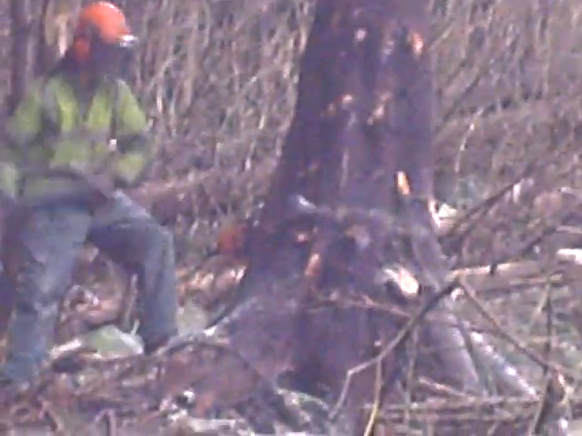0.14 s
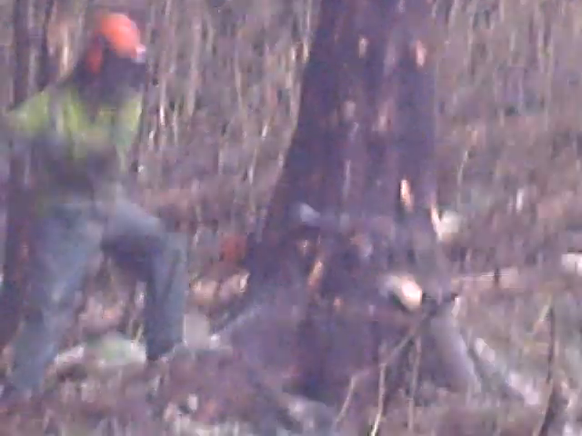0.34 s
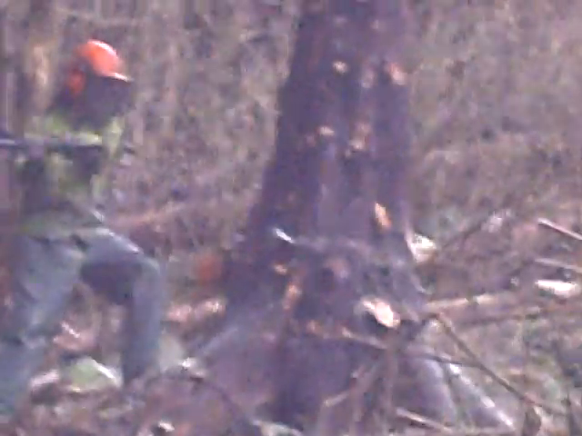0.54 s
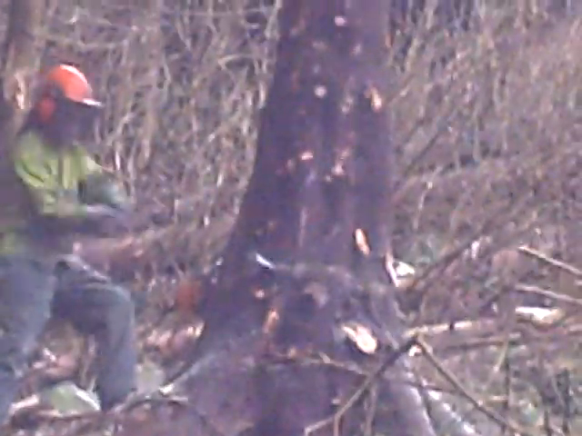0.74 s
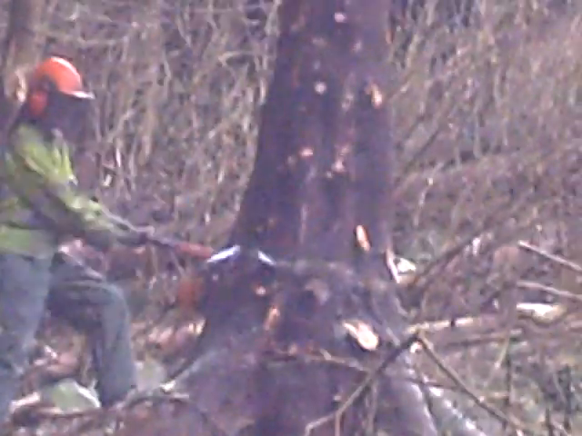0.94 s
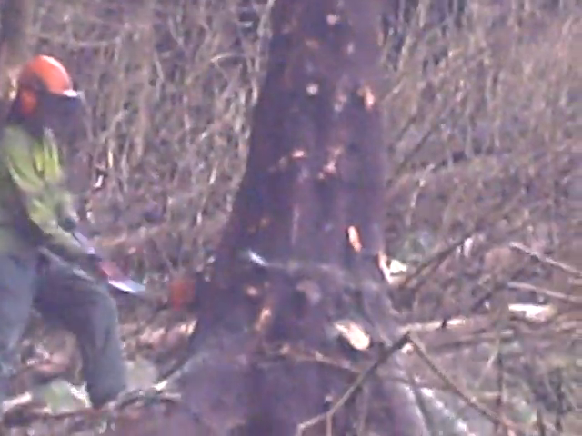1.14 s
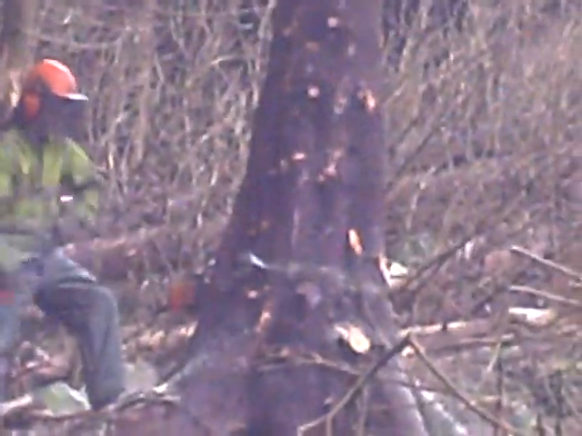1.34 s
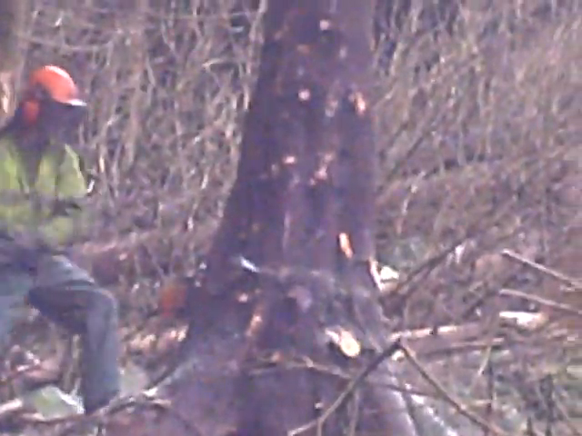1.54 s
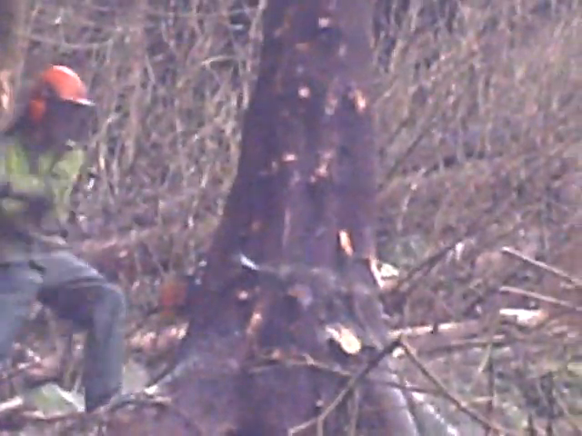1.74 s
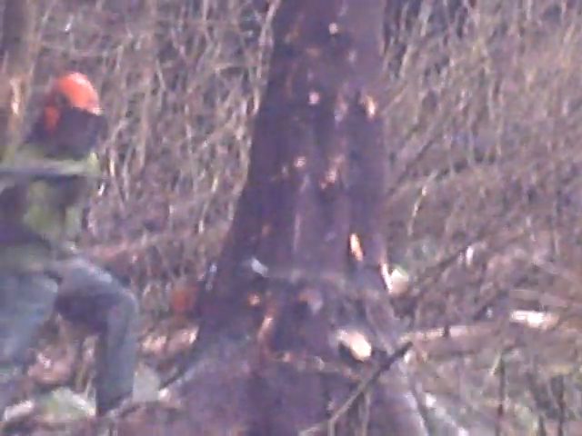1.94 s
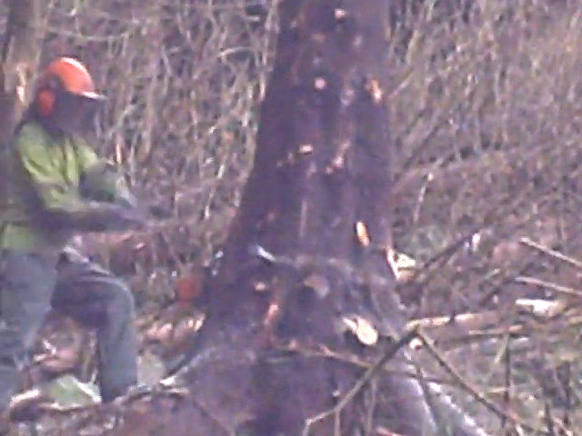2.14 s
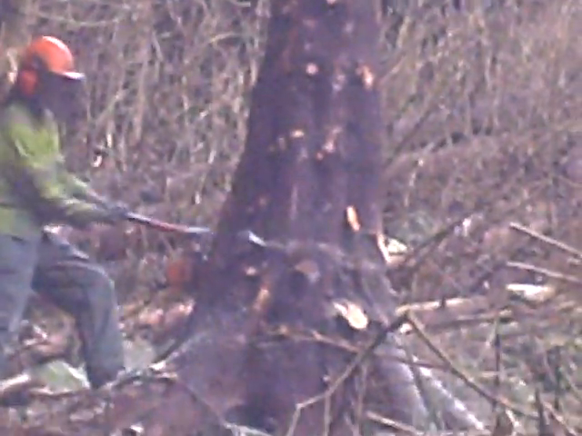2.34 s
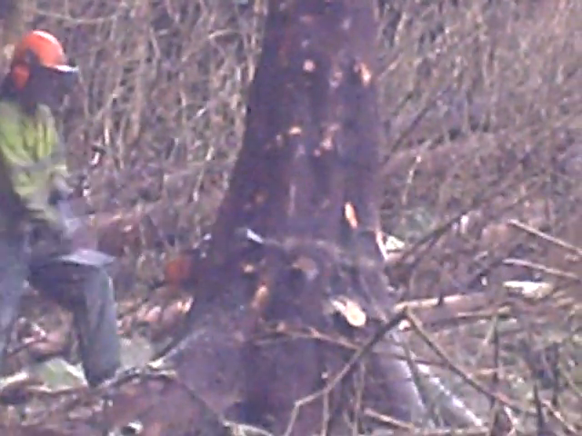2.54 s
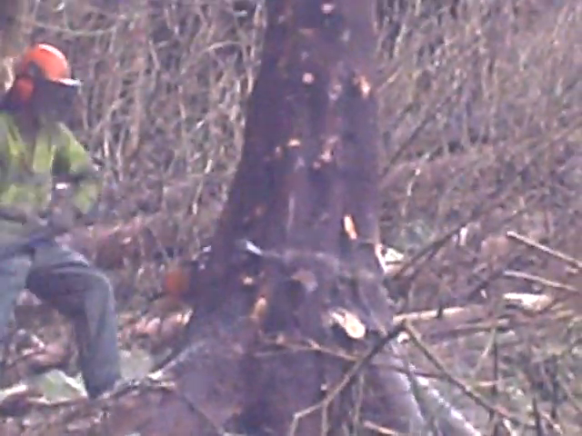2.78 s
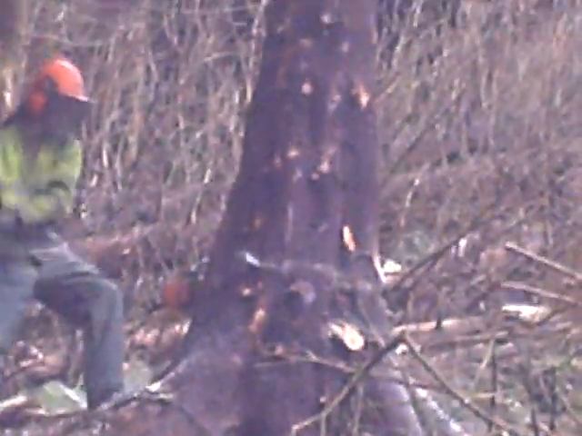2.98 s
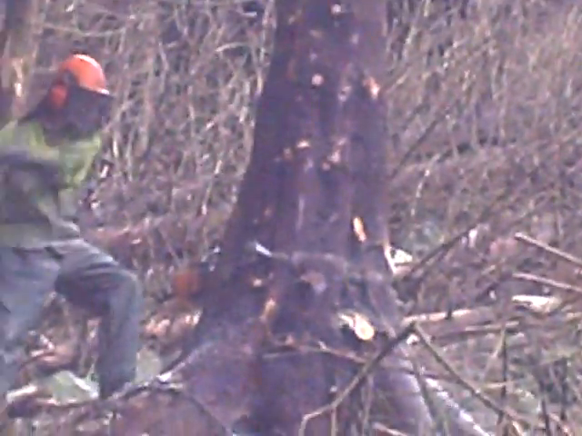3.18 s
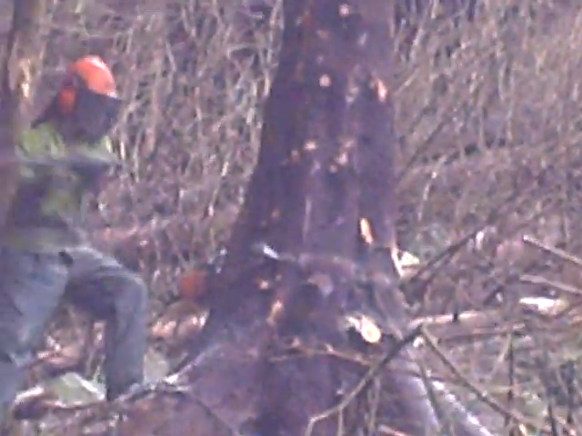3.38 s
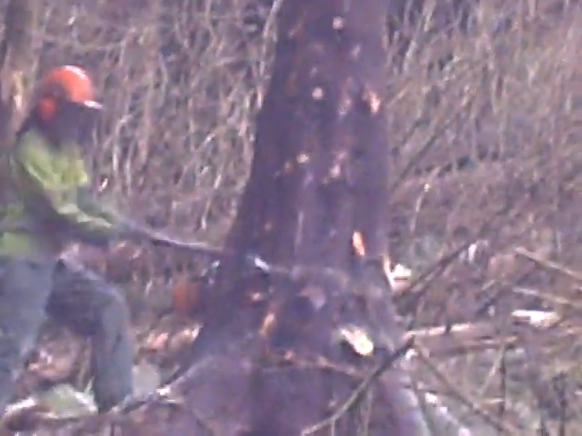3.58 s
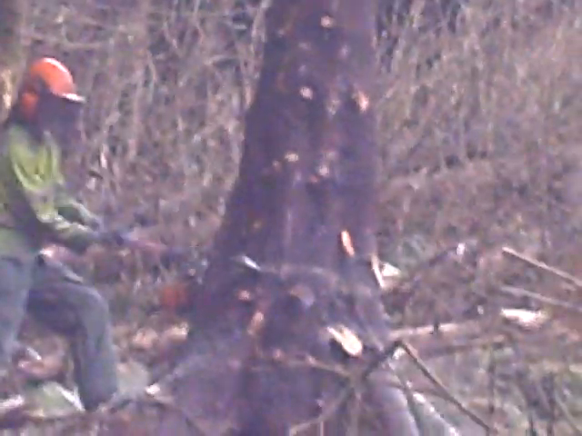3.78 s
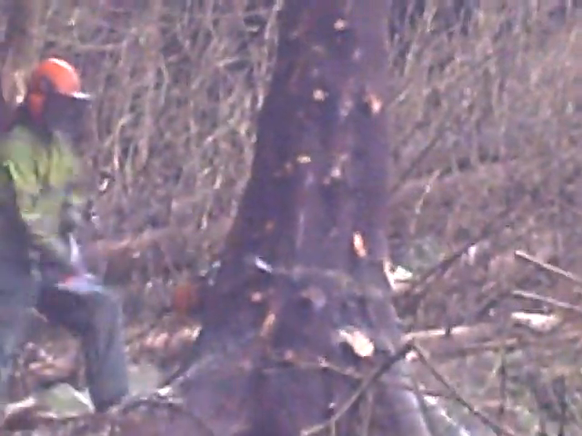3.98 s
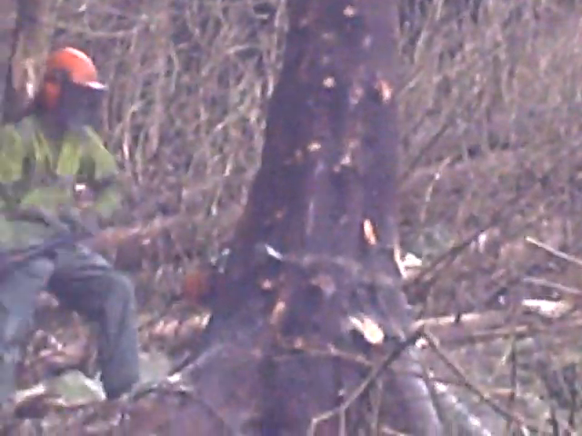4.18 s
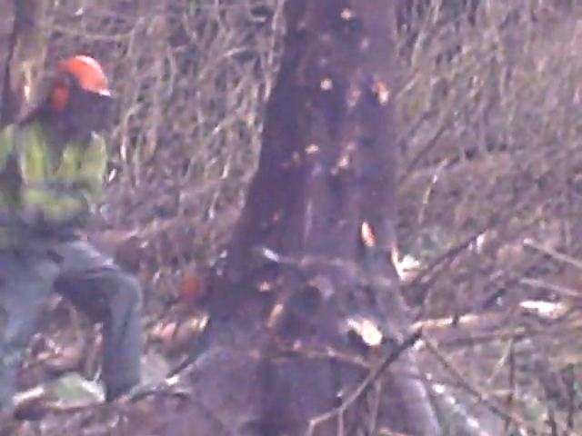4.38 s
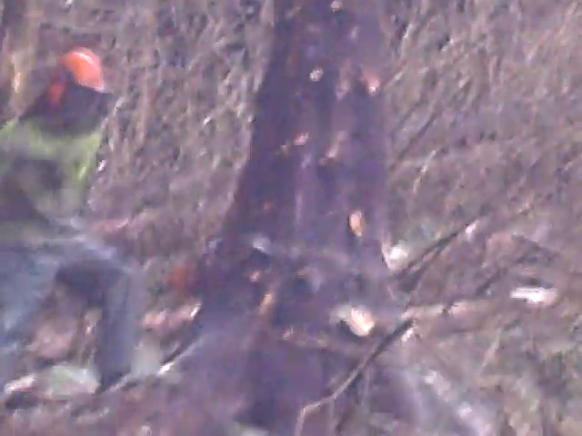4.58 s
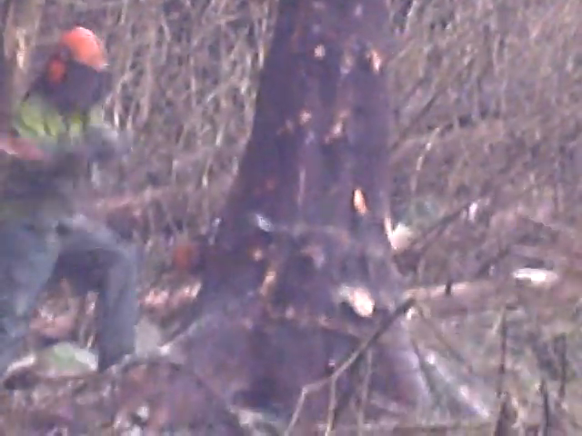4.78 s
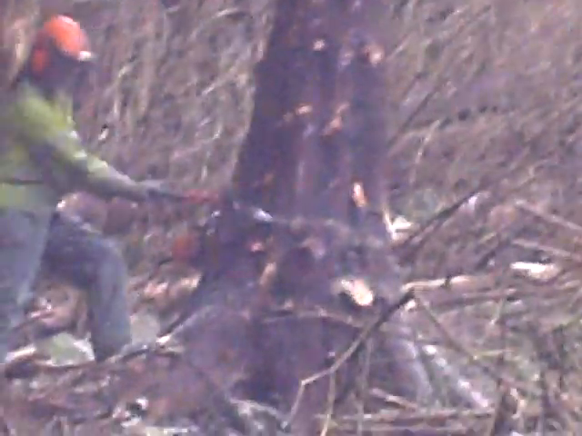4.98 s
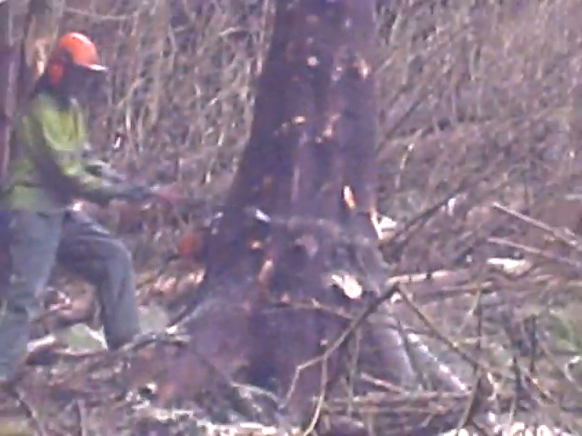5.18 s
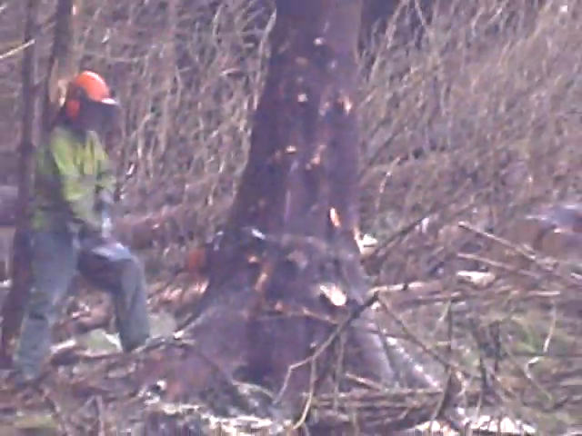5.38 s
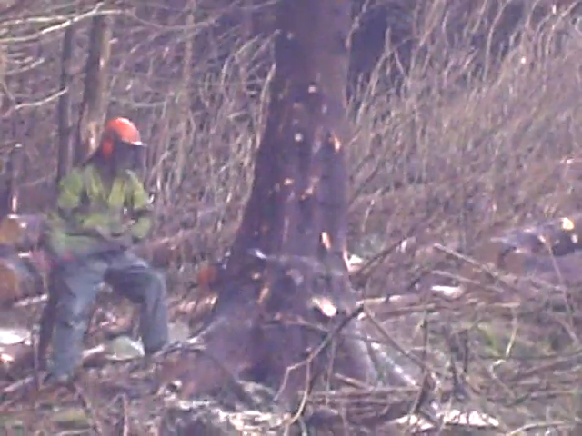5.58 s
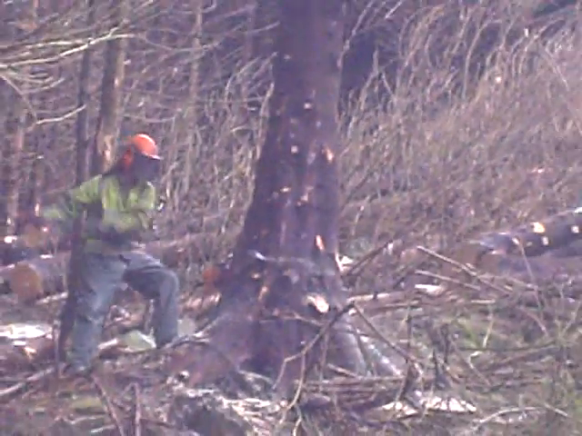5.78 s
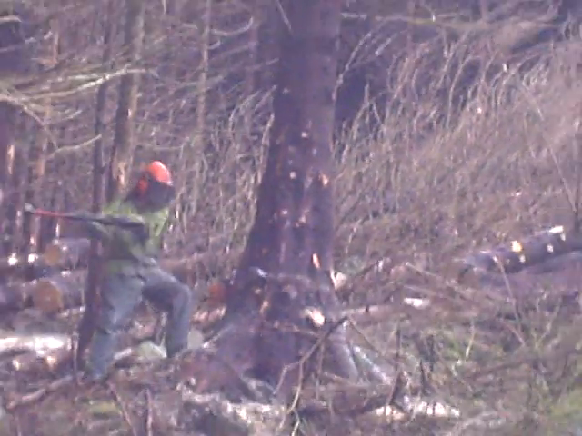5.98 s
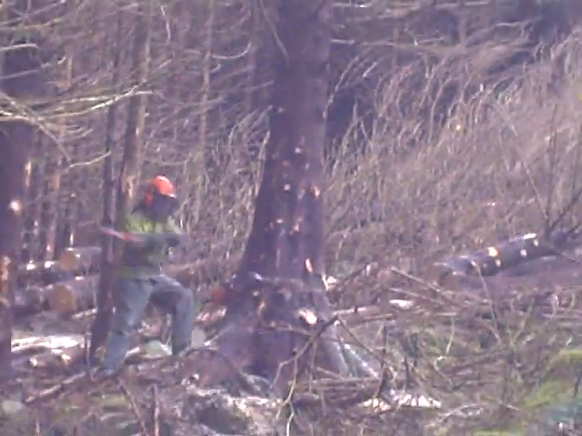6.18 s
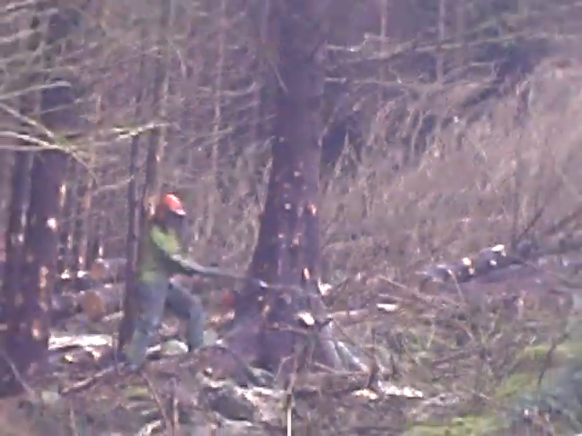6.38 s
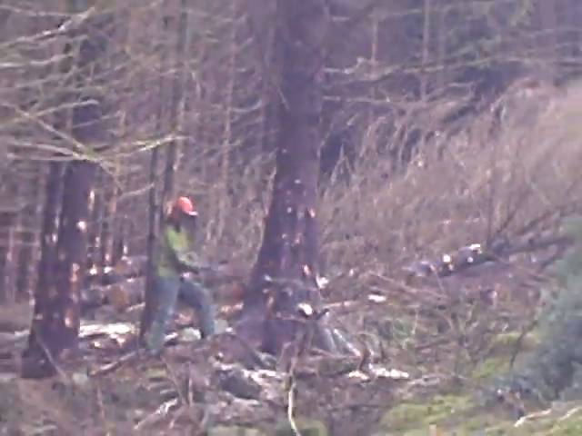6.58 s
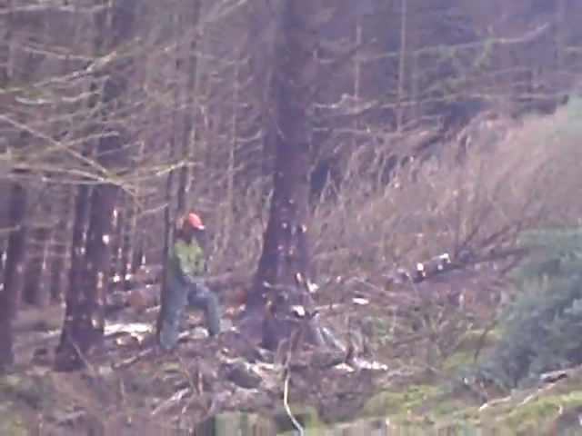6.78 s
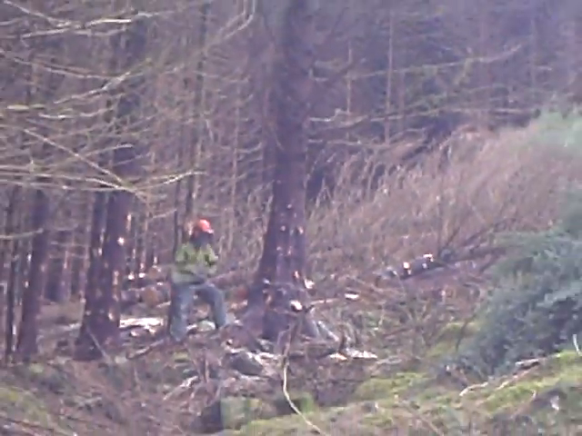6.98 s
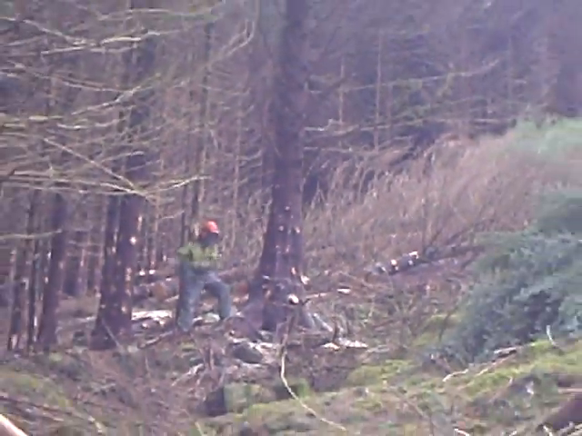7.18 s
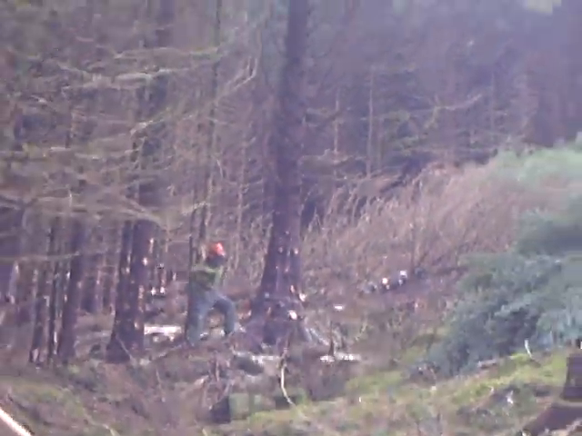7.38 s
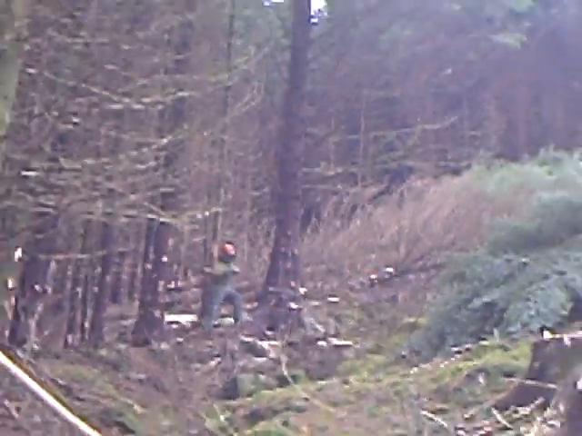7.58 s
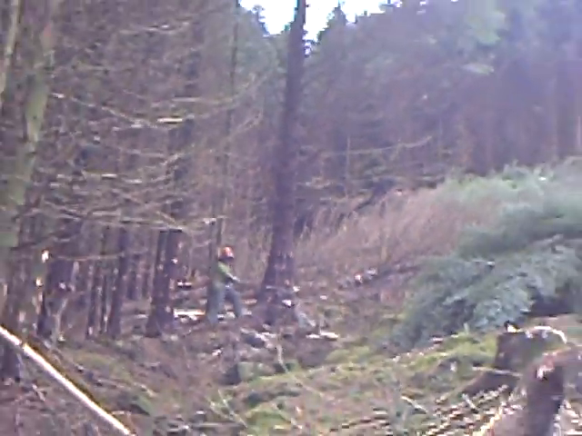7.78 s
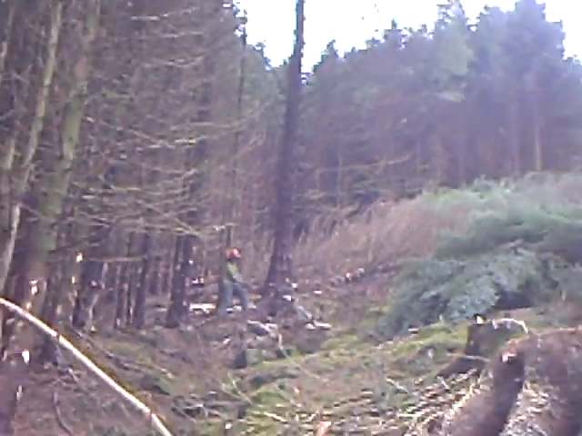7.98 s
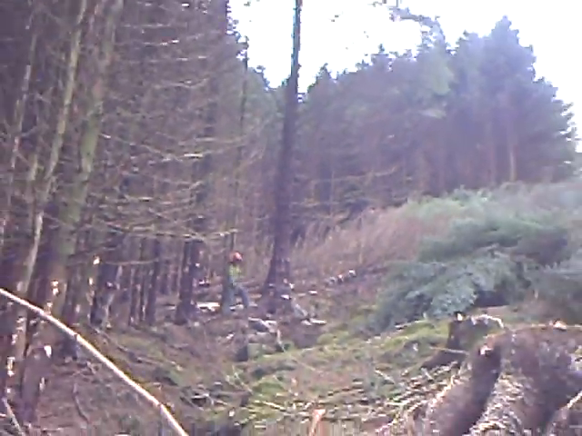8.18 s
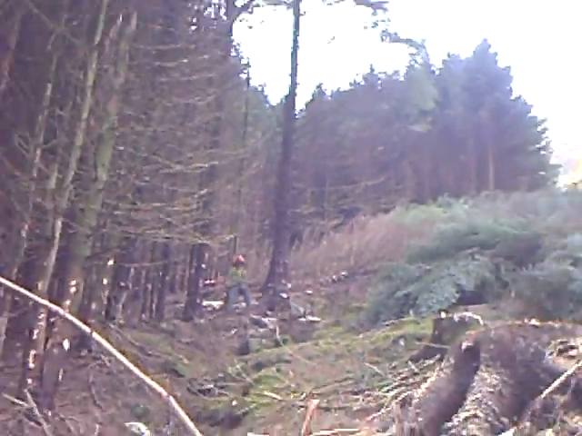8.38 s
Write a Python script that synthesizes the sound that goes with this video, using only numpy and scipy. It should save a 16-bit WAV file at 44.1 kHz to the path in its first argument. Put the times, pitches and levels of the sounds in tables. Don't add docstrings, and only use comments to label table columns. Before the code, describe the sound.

A quiet wooded hillside heard through a small camera microphone: low motor hum with a thin, rattling whirr, soft wind and hissing needles, and a fine patter of dry ticks. A faint distant engine note swells around 1 second, sags slightly and is gone by about 3. At 1.1 seconds a sledge hits a steel wedge, a glancing metallic clank with a crack and thud, its bright ring thrown back by the trunks as a short blurred echo. Further blows follow at 2.4, 3.8, 5.2, 6.5 and 7.9 seconds, the fifth hardest; the direct clank gets gradually duller, and the strikes overload the input. Between them come clear twig snaps, notably near 1.6 and 6.6, soft dull hand rubs near 0.5, 3.1 to 3.6, 5.4 and 8.1, and one camera button click at 5.0, just before the fourth blow. The last echo fades into hum at 8.4.

```python
import sys
import numpy as np
from scipy import signal
from scipy.fft import rfft, irfft, next_fast_len
from scipy.io import wavfile
from scipy.ndimage import uniform_filter1d, map_coordinates

SR = 44100
rng = np.random.default_rng(int(sys.argv[2]) if len(sys.argv) > 2 else 0)


def ratio_of_db(decibels):
    return 10 ** (np.asarray(decibels, float) / 20)


def materialize(psi):
    bounded = np.clip(np.atleast_2d(psi).T, -1, 1)
    quanta = np.round(bounded * 32767).astype(np.int16)
    wavfile.write(sys.argv[1], SR, quanta)


N = 371763

# (frequency [Hz], level [dB], t60 [s])
STEEL_MODES = [(700, -8, 0.018), (896, -6, 0.025), (1330, -10, 0.049), (1641, -4, 0.042), (2102, -7.5, 0.057),
               (2622, -4.5, 0.04), (2893, 4, 0.044), (3025, -1, 0.023), (3187, -7, 0.05), (3664, -1, 0.02),
               (3905, 2, 0.028), (4337, 7, 0.023),
               (4900, -9, 0.0083), (4700, -4.5, 0.015), (4911, 3.5, 0.024), (5153, -13.5, 0.022),
        (5315, 3.5, 0.022), (5330, 4.5, 0.012), (5900, -8.5, 0.022), (5845, 3.5, 0.026), (6090, -13, 0.017),
        (7090, -11.5, 0.019), (7500, -9.5, 0.012)]
STEEL = STEEL_MODES


def hammer():
    # (time [s], strength [dB], squareness of the hit [dB])
    blows = [
        (1.0598, -2, -8),
        (2.4209, -1.5, -1.5),
        (3.7967, -2, -1),
        (5.157, -0.5, 0),
        (6.5475, 1.5, 3),
        (7.9435, 0.5, -0.5),
    ]
    # (frequency to camera [Hz], level to camera [dB], frequency to woods [Hz], level to woods [dB])
    leading_modes = [(4230, 11, 5800, 25), (5250, 12, 5400, 25), (4650, 8, 5270, 24), (4720, 16, 4800, 21),
                     (5210, 12, 5200, 31), (5220, 10, 5250, 28)]
    toward_camera = [-9, -9.5, -2.5, 2.5, 1.5]
    toward_woods = [21.5, 16.9, 17, 22, 21]
    top_loss_db_per_s, low_gain_db_per_s = 2.2, 0.5
    echo_per_square = 0.7
    out = np.zeros(N + SR)
    for (s, db, square_db), lead in zip(blows, leading_modes):
        driven_s = s - blows[0][0]
        camera_change_db = [0, 0, 0, square_db, -top_loss_db_per_s * driven_s]
        woods_change_db = [0, low_gain_db_per_s * driven_s, 0, echo_per_square * square_db, 0]
        direct = ratio_of_db(db) * clank(np.add(toward_camera, camera_change_db), lead[:2])
        answer = echo(np.add(toward_woods, woods_change_db), lead[2:], blur_hz=130)
        start = round(s * SR)
        out[start:][:len(direct)] += direct
        out[start:][:len(answer)] += answer
    return out[:N]


def clank(shares_db, lead):
    # (frequency [Hz], width [Hz], level [dB])
    splinter_modes = [(1568, 300, -0.5), (3000, 540, 1), (4630, 2400, -3.5)]
    damping = 0.91
    t = np.arange(SR // 10) / SR
    hz = gripped(lead[0])
    t60 = damping * np.transpose(STEEL)[2][:, None]
    wander = 0.026 * np.cumsum(rng.standard_normal((len(hz), len(t))), axis=1)
    phase = 2 * np.pi * (hz * t + rng.random(hz.shape)) + wander
    level_db = mode_levels(shares_db, lead)[:, None] - 60 * t / t60
    ring = np.sum(ratio_of_db(level_db) * np.sin(phase), axis=0)

    response = resonances(splinter_modes)(np.fft.rfftfreq(len(t), 1 / SR))
    splinter = irfft(rfft(rng.standard_normal(len(t))) * response, len(t))
    crack = ratio_of_db(8.5 - 60 * t / 0.032) * splinter

    trunk = signal.lfilter([0.05, -0.05], [1, -1.94, 0.9408], rng.standard_normal(len(t)))
    thud = ratio_of_db(shares_db[0] + 13.5 - 60 * t / 0.05) * trunk
    contact = 1 - np.exp(-t / 0.00025)
    return (ring + crack + thud) * contact


def echo(shares_db, lead, blur_hz):
    trunks = np.pad(woods(scatter_db=4.5, first_s=0.0098), (0, SR // 10))
    f = np.fft.rfftfreq(len(trunks), 1 / SR)
    hz = gripped(lead[0])
    level_db = mode_levels(shares_db, lead)[:, None]
    power = np.sum(ratio_of_db(2 * level_db) / (1 + (2 * (f - hz) / blur_hz) ** 2), axis=0)
    return irfft(rfft(trunks) * np.sqrt(power), len(trunks))


def woods(scatter_db, first_s):
    # (frequency [Hz], t60 [s])
    trunk_decay = [(300, 0.3), (1000, 0.46), (3000, 0.5), (5000, 0.45), (8000, .3)]
    trunks = rng.standard_normal(SR // 2) * ratio_of_db(scatter_db * rng.standard_normal(SR // 2))
    hz, t, z = signal.stft(trunks, SR, nperseg=256)
    decay = ratio_of_db(-60 * t / along(trunk_decay, hz)[:, None])
    tail = signal.istft(z * decay, SR, nperseg=256)[1]
    tail *= np.clip(np.arange(len(tail)) / SR / first_s, 0, 1)
    return tail / np.linalg.norm(tail)


def mode_levels(shares_db, lead):
    ring_edges = [2250, 3450, 4750, 5450]
    hz, level_db = gripped(lead[0])[:, 0], np.transpose(STEEL)[1]
    share_db = shares_db[np.searchsorted(ring_edges, hz)]
    return np.where(hz == lead[0], lead[1], level_db + share_db + rng.normal(0, 1.1, hz.shape))


def gripped(lead_hz):
    hz = np.transpose(STEEL)[0]
    distance = np.abs(hz - lead_hz)
    return np.where(distance == distance.min(), lead_hz, hz)[:, None]


def button():
    # (time [s], peak [dB])
    presses = [(5.042, -8)]
    # (frequency [Hz], width [Hz], level [dB])
    shell = [(350, 510, -1.5), (1270, 320, 7.5), (3480, 470, -2), (5220, 1700, -2.5), (7300, 900, -8)]
    taps = np.zeros(N)
    for s, db in presses:
        taps[round(s * SR)] = ratio_of_db(db + 6)
        taps[round((s + 0.0004) * SR)] = -ratio_of_db(db - 2)
        taps[round((s + 0.0011) * SR)] = ratio_of_db(db + 20)
        taps[round((s + 0.0019) * SR)] = ratio_of_db(db + 2)
    return filtered(taps, resonances(shell))


def motor():
    # (time [s], level [dB])
    shaft_load = [(0, -38.5), (1.3, -38), (1.7, -35.5), (2.6, -38.5), (4, -38), (6, -39.5), (7.5, -39),
                  (8.43, -37.5)]
    # (frequency [Hz], width [Hz], level [dB])
    housing = [(1180, 28, -4.5), (2056, 60, -11), (2414, 120, -12), (4146, 150, -1), (4306, 170, -3),
               (4590, 190, -2), (4990, 460, -9.5), (6440, 1400, -20.5)]
    shaft_hz, mean_whirr_db, whirr_per_load = 69.85, -38.5, 0.64
    hum_db, = curves(shaft_load)
    whirr_db = mean_whirr_db + whirr_per_load * (hum_db - hum_db.mean())
    turn = 2 * np.pi * np.cumsum(shaft_hz + 0.27 * wobble(4.21)) / SR
    first = ratio_of_db(0.63 * wobble(4)) * np.sin(turn)
    second = ratio_of_db(-8 + 1.6 * wobble(11)) * np.sin(2 * turn + 0.42 * wobble(8.4))
    bursts_db = 2.8 * wobble(70) + 0.46 * wobble(7.6) + 0.39 * np.cos(turn)
    rattle = rng.standard_normal(N) * ratio_of_db(bursts_db)
    whirr = unit(filtered(rattle, resonances(housing)))
    return ratio_of_db(hum_db + 5.5) * (first + second) + ratio_of_db(whirr_db - 0.5) * whirr


def rustles():
    # (time [s], length [s], level [dB], frequency [Hz])
    rubs = [(0.517, 0.063, -37.5, 178), (3.104, 0.021, -37.5, 350), (3.193, 0.084, -41, 330),
            (3.616, 0.063, -41.5, 296), (5.437, 0.041, -41, 700), (8.141, 0.052, -39, 454)]
    t = np.arange(N) / SR
    out = np.zeros(N)
    for s, length, db, hz in rubs:
        rub = unit(filtered(rng.standard_normal(N), resonances([(hz, 0.3 * hz, 0)])))
        out += ratio_of_db(db + 2.5 * wobble(40)) * np.exp(-((t - s) / length) ** 2) * rub
    return out


def ticks():
    # (time [s], peak [dB])
    clear_ticks = [(0.825, -30), (1.1663, -17), (1.2739, -24), (1.5754, -12), (1.676, -28), (2.544, -25),
                   (3.0673, -20), (3.3387, -21), (3.477, -26), (4.154, -28), (4.9675, -20), (5.2389, -16),
                   (5.7647, -25), (6.5963, -13), (7.0314, -24), (8.0076, -20)]
    chance, sizes = rng.random(N), rng.exponential(size=N)
    snaps = (chance < 220 / SR) * ratio_of_db(-36.5 + 3.1 * sizes)
    for s, db in clear_ticks:
        snaps[round(s * SR)] = ratio_of_db(db + 13)
    return filtered(snaps, resonances([(3500, 2500, -8.5), (7040, 3000, -4)]))


def wind():
    # (time [s], level [dB])
    strength = [(0, -41.5), (.7, -41.5), (1.3, -41.5), (1.95, -44.5), (2.7, -43), (3.2, -44), (3.75, -43),
                (4.1, -45), (5.1, -45), (6.4, -44.5), (7.8, -45.5), (8.15, -43), (8.43, -46)]
    # (frequency [Hz], level per Hz [dB])
    gust_spectrum = [(20, -7), (45, 1.5), (95, -1.5), (125, 4), (200, -5), (400, -5), (800, -14),
                     (1500, -40)]
    # (frequency [Hz], level per Hz [dB])
    needle_spectrum = [(300, -25.5), (700, -2), (1200, 0.5), (1750, -7), (3300, -3.5), (5800, -4.5),
                       (7000, -18.5), (8000, -42.5)]
    mean_leaves_db, leaves_per_gust = -40, 0.52
    gust_db, = curves(strength)
    leaves_db = mean_leaves_db + leaves_per_gust * (gust_db - gust_db.mean())
    gusts = ratio_of_db(gust_db + 4.0) * rush(gust_spectrum, patchy_db=0.5)
    return gusts + ratio_of_db(leaves_db) * rush(needle_spectrum, patchy_db=1.5)


def drone():
    peak_s, swell_s, fade_s = 1.05, 0.86, 0.83
    mid_hz, sag_hz_per_s, level_db = 322.5, 5, -45.5
    t = np.arange(N) / SR - peak_s
    heard = np.exp(-(t / np.where(t < 0, swell_s, fade_s)) ** 2)
    hz = mid_hz - sag_hz_per_s * t + 5 * wobble(12)
    return heard * ratio_of_db(level_db + 2 * wobble(7.5)) * np.sin(2 * np.pi * np.cumsum(hz) / SR)


def unit(x):
    return x / np.sqrt(np.mean(x ** 2) + 1e-20)


def along(points, hz):
    f, v = np.transpose(points)
    return np.interp(np.log(hz + 1), np.log(f + 1), v)


def curves(rows):
    s, *cols = np.transpose(rows)
    return [np.interp(np.arange(N) / SR, s, c) for c in cols]


def wobble(rate):
    knots = rng.standard_normal(int(N * 200 / SR) + 4)
    return map_coordinates(knots, [np.arange(N) * min(rate, 200) / SR])


def filtered(x, response):
    m = next_fast_len(N + SR // 2)
    return irfft(rfft(x, m) * response(np.fft.rfftfreq(m, 1 / SR)), m)[:N]


def resonances(modes):
    def response(f):
        total = 0
        for k, (c, w, db) in enumerate(modes):
            total = total + (-1) ** k * ratio_of_db(db) * 1j * f * w / (c * c - f * f + 1j * f * w)
        return total
    return response


def rush(spectrum, patchy_db):
    z = signal.stft(rng.standard_normal(N), nperseg=512)[2]
    field = uniform_filter1d(rng.standard_normal(z.shape), size=6, axis=0)
    field = uniform_filter1d(field, size=12, axis=1)
    patches = signal.istft(z * ratio_of_db(patchy_db * unit(field)), nperseg=512)[1][:N]
    return unit(filtered(patches, lambda hz: ratio_of_db(along(spectrum, hz))))


def scene():
    return (hammer() + button() + motor() + rustles() + ticks() + wind() + drone())[None]


def band_limit(x):
    return signal.sosfilt(signal.butter(12, 17010, fs=SR, output="sos"), x)


def record(dry):
    top_hz, ceiling = 8070, 0.7
    narrow = filtered(dry[0], lambda hz: np.clip((top_hz + 550 - hz) / 900, 0, 1) ** 2)
    clipped = narrow / (1 + np.abs(narrow / ceiling) ** 40) ** (1 / 40)
    # (frequency [Hz], level [dB])
    treble = [(6500, -1), (8600, -8.5), (10500, -3.0), (13000, -13.5), (15300, -15), (16600, -34)]
    dulled = filtered(clipped, lambda hz: ratio_of_db(along(treble, hz)))
    return band_limit(dulled[None])


dry = scene()
out = record(dry)
materialize(out)
```